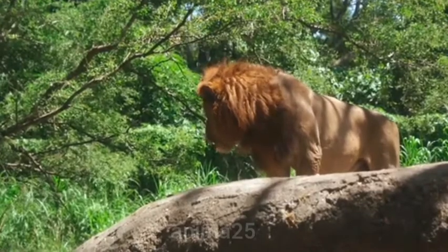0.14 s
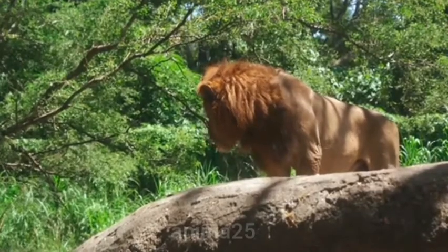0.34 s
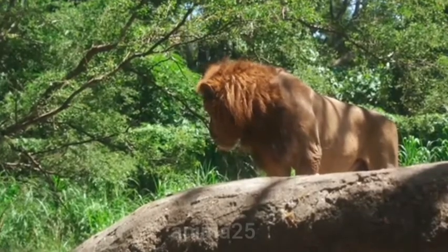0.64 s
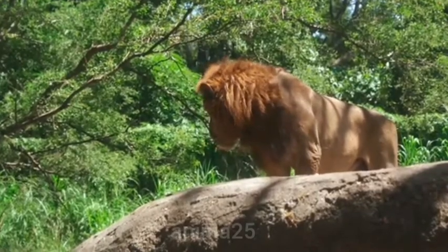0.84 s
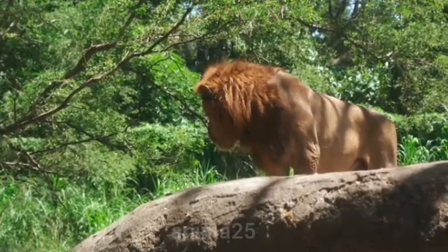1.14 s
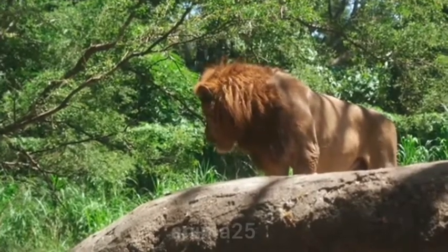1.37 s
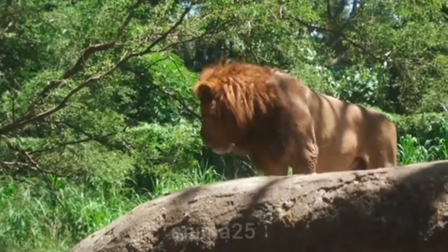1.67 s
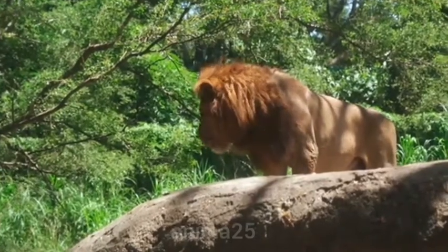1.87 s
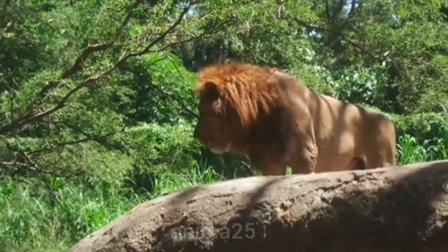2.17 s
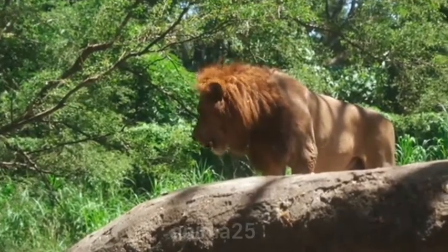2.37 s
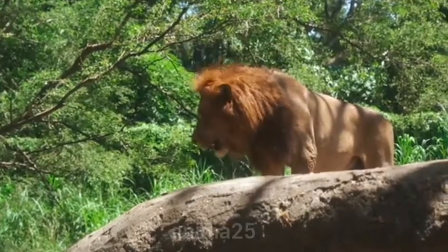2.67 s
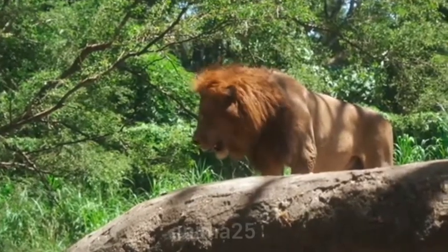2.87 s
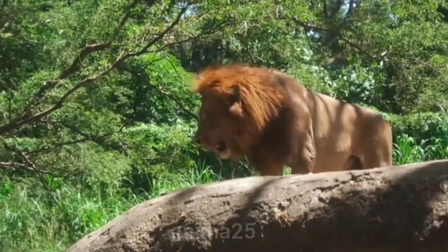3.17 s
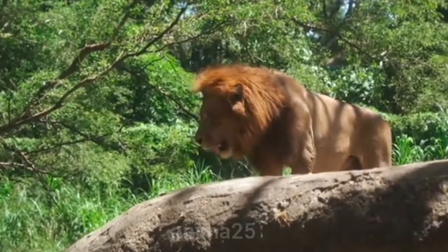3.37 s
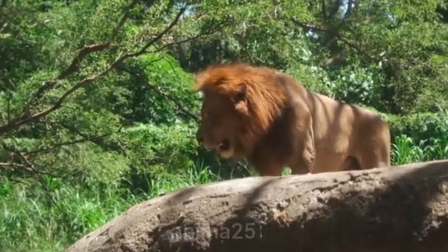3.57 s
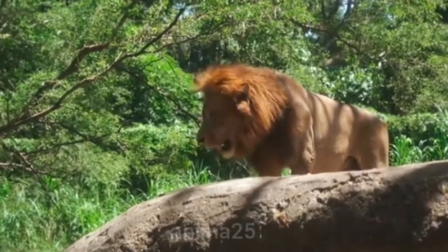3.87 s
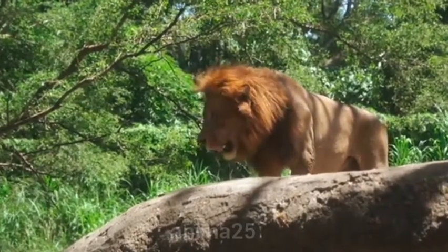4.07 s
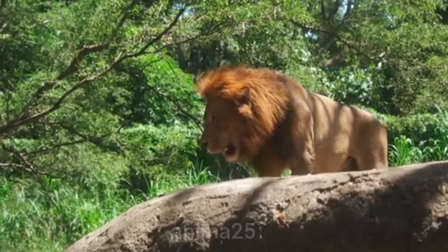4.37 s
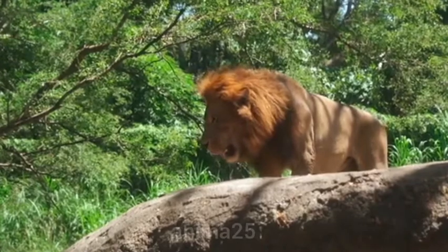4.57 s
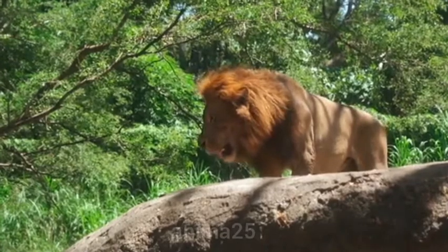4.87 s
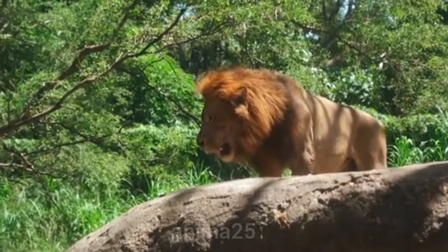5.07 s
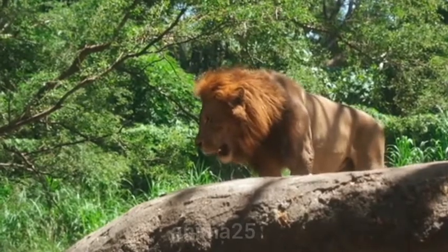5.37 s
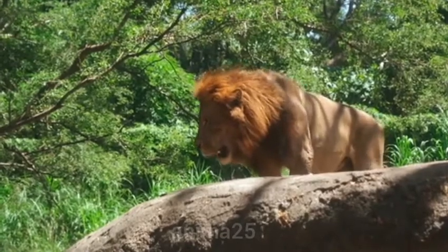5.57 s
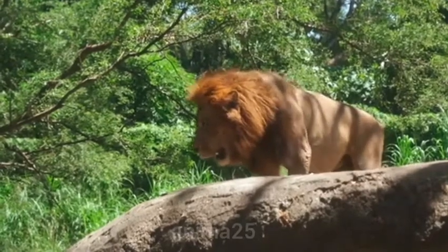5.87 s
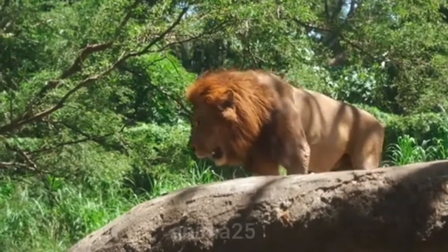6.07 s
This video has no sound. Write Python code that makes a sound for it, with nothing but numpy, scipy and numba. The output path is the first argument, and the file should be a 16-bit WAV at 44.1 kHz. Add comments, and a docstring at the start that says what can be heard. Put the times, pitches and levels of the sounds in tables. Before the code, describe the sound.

Five chesty lion grunts, roughly one per second, follow the harsh tail of a roar, over outdoor rush, low gusts and faint distant whistles.

```python
"""A male lion ends a roar and follows it with five deep grunts, about one a second, in a leafy outdoor enclosure.
Each grunt opens with a rasp, swells into a chesty tone and closes with a rasp: folds drive throat and mouth
resonances. Rock walls throw the voice back as smeared echoes, built by convolution.
Gusts of low noise buffet the microphone, and a thin far whistle, an airy gliding tone, wavers over a steady
outdoor rush of shaped noise."""
import sys
import numpy as np
from scipy import signal
from scipy.fft import rfft, irfft
from scipy.io import wavfile
from scipy.ndimage import uniform_filter1d
from numba import njit

SR = 44100
rng = np.random.default_rng(int(sys.argv[2]) if len(sys.argv) > 2 else 0)


def transcribe(u):
    """Save the signal u as a 16-bit wav file named by the first command-line argument.

    u: samples, shape (n,) or (channels, n), limited to [-1, 1]; the rate is SR.
    q: integer samples, one column per channel.
    """
    v = np.clip(np.atleast_2d(u).T, -1, 1)
    q = np.round(v * 32767).astype(np.int16)
    wavfile.write(sys.argv[1], SR, q)


N = 274302
TIME = np.arange(N) / SR

SHIMMER_DB = 2.2   # unsteadiness of the tones
PUFF_DEPTH = .85   # how deeply the turbulence swells and sinks in each cycle

# The five grunts, timed from the closing rasp; levels are before the trims in lion():
# closing_s, run_up_s (opening rasp before closing), lead_s (fullest tone before closing), swell_s, fade_s,
# pitch_hz, moan_db, chest_db, closing_moan_db, opening_rasp_db, closing_rasp_db, closing_length_s,
# opening_hiss_db, hiss_delay_s, closing_hiss_db, jaw (0-1), lift_db (upper resonances), tuning (throat ratio)
GRUNTS = [(1.263, 0.15, 0.046, 0.022, 0.017, 169.1, -36, -11, -21, -29.5, -26.5, 0.033, -44, 0.067, -39.5, 0.74, 2, 1.02),
          (2.295, 0.13, .039, 0.016, 0.022, 164.9, -34.5, -12, -26, -27.5, -29.5, 0.017, -42, 0.06, -42, 0.8, 0.5, 1.03),
          (3.352, 0.12, .043, .019, .011, 161.5, -36, -12, -22, -27, -28, 0.026, -41, .05, -43.5, 0.64, 1.5, 1.01),
          (4.402, .1, .033, .02, .013, 160.8, -28, -13.5, -20.5, -27, -31.5, 0.012, -42, .0033, -45.5, 0.94, 8.5, .995),
          (5.498, 0.089, 0.037, 0.017, .025, 154.2, -28, -17.5, -26, -27.5, -28, 0.017, -41.5, .003, -44, 0.67, 2, 0.99)]


def lion(clearing_db=16, jitter=.075, flutter_db=5.0, doubling=0.21, chest_db=-2.0, overtones_db=-25,
         between_db=-11, pulsing=0.2, rasp_db=-2.6, hiss_db=-2.0, tone_hiss_db=-33):
    """Heavy folds flap loosely at both ends of a grunt and lock into a clear tone in its middle."""
    pitch, tone = chest_tone()
    _, _, roar_rasp, roar_hiss, _ = roar()
    rasp = roar_rasp + rasp_pushes()
    hiss = np.hypot(roar_hiss + hiss_pushes(), from_db(tone_hiss_db) * tone)
    # the more the tone outweighs the rasp, the cleaner the voice
    rough = np.clip(.78 - 20 * np.log10(tone / rasp) / clearing_db, .33, .72)

    # the pitch wanders as the folds slacken
    cycles = 1 / 4 + np.cumsum(pitch * (1 + jitter * rough * drift(70))) / SR
    phase = 2 * np.pi * cycles
    chest = np.sqrt(2) * np.cos(phase) * from_db(SHIMMER_DB * rough * drift(52))

    # each cycle gives a pulse, with a puff of turbulence swelling around it
    pulses = rms_one(np.diff(np.floor(cycles), prepend=0) - pitch / SR)
    puffs = rms_one(rng.standard_normal(N) * (1 + PUFF_DEPTH * np.cos(phase)))
    # slack folds beat strong-weak
    strong_weak = 1 + doubling * rough * np.cos(phase / 2)
    flutter = from_db(flutter_db * rough * drift(84)) * strong_weak
    source = (np.sqrt(1 - rough) * pulses + rough * puffs) * flutter
    # that beat adds an unsteady partial between the first two
    between = from_db(between_db) * np.sqrt(2) * drift(21) * np.sin(phase * 3 / 2)

    # the throat rings with the rasp and, far more softly, with the chest tone
    drive = np.hypot(from_db(rasp_db) * rasp, from_db(overtones_db) * tone)
    breath = from_db(hiss_db) * hiss * mouth((puffs + pulsing * pulses) * flutter)
    growl = drive * throat(source) + rasp * between + breath
    clean = np.sqrt(tone * rasp) * overtones(phase, pitch)
    return from_db(chest_db) * tone * chest + clean + growl


# The harsh end of the last full roar; levels are before the trims in lion():
# time_s, pitch_hz, chest_db, rasp_db, hiss_db, jaw (0-1)
ROAR = [(0.0, 198.2, -11, -15.5, -33, 0.08), (0.051, 207.4, -29.5, -27, -40.5, 0.98),
        (0.079, 204.2, -19, -26, -32, 0.75), (0.109, 170.8, -24, -27.5, -42, 0.45),
        (0.143, 164.1, -22.5, -24, -39.5, 0.6), (0.183, 177.9, -36, -40, -44, 0)]
ROAR_FADE_S = .025


def roar():
    """Pitch, then strength of tone, rasp and hiss, then jaw opening of the roar as it dies away."""
    pitch, *levels, jaw = in_time(ROAR)
    fade = held(0, ROAR[-1][0], ROAR_FADE_S, ROAR_FADE_S)
    return pitch, *(from_db(levels) * fade), jaw * fade


MOAN_LEAD_S, MOAN_S, MOAN_RATIO = .03, .018, 1.13   # a soft, higher moan just before the opening rasp
PITCH_SAG, PITCH_ARCH_S = .105, .062   # the pitch drops by this share on both sides of the fullest tone
CREST_S = .04   # rounding of the chest tone's top
STOP_LAG_S, STOP_S = .02, .016   # the folds stop soon after the closing rasp begins
CLOSING_LAG_S, CLOSING_MOAN_S, CLOSING_RATIO = .014, .018, 1.07   # the last push jerks the pitch up again


def chest_tone():
    """Pitch and strength of the folds: a brief moan, a swell whose pitch arches with effort, a moan to close."""
    pitch, strength, *_ = roar()
    weighted = pitch * strength
    for closing, run_up, lead, swell_s, fade_s, hz, moan_db, tone_db, last_db, *_ in GRUNTS:
        age = TIME - (closing - lead)
        from_crest = np.hypot(age, CREST_S) - CREST_S
        swell = from_db(tone_db) * np.exp(-from_crest / np.where(age < 0, swell_s, fade_s))
        swell = swell * held(0, closing + STOP_LAG_S, STOP_S, STOP_S)
        moan = from_db(moan_db) * np.exp(-((TIME - (closing - run_up - MOAN_LEAD_S)) / MOAN_S) ** 2)
        last = from_db(last_db) * np.exp(-((TIME - closing - CLOSING_LAG_S) / CLOSING_MOAN_S) ** 2)
        sag = PITCH_SAG * (1 - np.exp(-(age / PITCH_ARCH_S) ** 2))
        strength = strength + swell + moan + last
        weighted = weighted + hz * (swell * (1 - sag) + moan * MOAN_RATIO + last * CLOSING_RATIO)
    # where sounds overlap, the stronger one sets the pitch
    return weighted / strength, strength


def rasp_pushes(attack_s=.01, slow_share=.3, release_s=0.019, snap_s=0.0057, closing_release_s=0.046,
                sag_db_per_s=45):
    """Air rasps in the throat: a long push to the fullest tone, sudden in the last grunts, and a closing one."""
    level = 0
    for closing, run_up, lead, _, _, _, _, _, _, open_db, close_db, length, _, delay, *_ in GRUNTS:
        opening = closing - run_up
        sag_db = sag_db_per_s * np.clip(TIME - opening, 0, run_up)
        rise_s = attack_s + slow_share * abs(delay)
        first_push = from_db(open_db - sag_db) * held(opening, closing - lead, rise_s, release_s)
        closing_push = from_db(close_db) * held(closing, closing + length, snap_s, closing_release_s)
        level = level + first_push + closing_push
    return level


def hiss_pushes(attack_s=0.0048, slow_share=0.89, release_s=0.035, sag_db_per_s=60, snap_s=0.0021,
                closing_lag_s=0.016, closing_hold_s=.023, closing_release_s=0.04):
    """The mouth hisses with the same two pushes; the later the first comes, the slower it builds."""
    level = 0
    for closing, run_up, lead, *_, open_db, delay, close_db, _, _, _ in GRUNTS:
        first, second = closing - run_up + delay, closing + closing_lag_s
        sag_db = sag_db_per_s * np.clip(TIME - first, 0, run_up)
        rise_s = attack_s + slow_share * abs(delay)
        first_push = from_db(open_db - sag_db) * held(first, closing - lead, rise_s, release_s)
        closing_push = from_db(close_db) * held(second, second + closing_hold_s, snap_s, closing_release_s)
        level = level + first_push + closing_push
    return level


# Low throat resonances: rest_hz, by_jaw_hz (added by a wide jaw), by_effort_hz (added at the fullest tone),
# by_roar_hz (added in the roar), width_hz, level_db (relative)
THROAT = [(410, 79.5, -24.5, -14, 60, 5), (540, 77.5, 1.5, -26.5, 47, -15.5), (809, -15, -12, 58, 56, -7.5),
          (1115, -9, 98, -27, 39, 1), (1270, 118, 59, -16, 174, -11.5), (1617, 8, 7.5, -43, 56, -8.5),
          (2127, -180, -5.5, -7, 140, -20)]
ROAR_LIFT_DB = -1.5   # the roar starts with its upper resonances held down
EFFORT_HALF_S = 0.047   # how long the throat is tensed around the fullest tone


def throat(source, low_hz=220, top_hz=2100, wobble=0.018):
    """The long throat's resonances bend with the jaw and the effort, and wobble with the soft tissue."""
    jaw = jaw_opening()
    roaring = held(0, ROAR[-1][0], ROAR_FADE_S, ROAR_FADE_S)
    effort = sum(np.exp(-((TIME - closing + lead) / EFFORT_HALF_S) ** 2) for closing, _, lead, *_ in GRUNTS)
    roar_shape = [(0, ROAR_LIFT_DB, 1), (ROAR[-1][0], 0, 1)]
    grunt_shape = [(closing, lift_db, ratio) for closing, *_, lift_db, ratio in GRUNTS]
    lift, tuning = in_time(roar_shape + grunt_shape)
    stretch = tuning * (1 + wobble * drift(12))
    rings = 0
    for k, (rest, by_jaw, by_effort, by_roar, width, db) in enumerate(THROAT):
        centre = (rest + by_jaw * jaw + by_effort * effort + by_roar * roaring) * stretch
        gain = from_db(db + lift * (k > 0))
        # neighbours alternate in sign
        rings = rings + (-1) ** k * gain * resonate(source, centre, float(width))
    return even(cut(cut(rings, low_hz, "high"), top_hz, "low", order=4), size=700)


# High mouth resonances: centre_hz, width_hz, level_db (relative)
MOUTH = [(1974, 260, -0.5), (2410, 400, 1), (2702, 150, 4), (3036, 310, -1), (3313, 205, 0.5),
         (3695, 120, -6.5), (4340, 150, -7), (5090, 240, -8.5), (5950, 170, -12.5), (6600, 350, -23.5),
         (7940, 230, -24), (9000, 830, -31), (11900, 8700, -40)]
# Tilt of the hiss's top resonances: time_s, treble_db
TREBLE_DB = [(0.1, 3), (1.2, -1.5), (2.25, 4), (3.3, 0), (4.35, -3.5), (5.45, -3)]


def mouth(turbulence, shift=0.042, treble_from_hz=6300):
    """Turbulence rings in steep mouth resonances that shift with the jaw; the treble differs by grunt."""
    out = 0
    stretch = 1 + shift * (jaw_opening() - .5)
    treble_db, = in_time(TREBLE_DB)
    for hz, width, db in MOUTH:
        # two passes steepen the skirts
        once = resonate(turbulence, hz * stretch, float(width))
        twice = resonate(once, hz * stretch, float(width))
        out = out + from_db(db + treble_db * (hz > treble_from_hz)) * twice
    return even(out)


JAW_LAG_S, JAW_HALF_S = 0.0022, 0.044   # the jaw is widest just after the closing rasp begins


def jaw_opening():
    """The jaw closes after the roar, then drops and closes once a grunt."""
    drops = sum(wide * np.exp(-((TIME - closing - JAW_LAG_S) / JAW_HALF_S) ** 2)
                for closing, *_, wide, _, _ in GRUNTS)
    return roar()[-1] + drops


# Clean overtones of the chest tone: pitch_hz, level_db (relative)
OVERTONES = [(330, -16), (490, -18), (650, -29), (810, -24), (980, -29), (1170, -15), (1330, -30),
             (1620, -28), (2000, -37)]
OVERTONE_LIFT_SHARE = 0.24   # share of a grunt's lift that its upper overtones get
OVERTONE_FLICKER_DB, OVERTONE_FLICKER_HZ = 3.5, 20


def overtones(phase, pitch, count=11):
    """Locked folds close sharply once a cycle: harmonics bend with the pitch, each flickering by itself."""
    lift, = in_time([(closing, lift_db) for closing, *_, lift_db, _ in GRUNTS])
    out = 0
    for k in range(2, count):
        flicker_db = OVERTONE_FLICKER_DB * drift(OVERTONE_FLICKER_HZ)
        db = at_hz(OVERTONES, k * pitch) + OVERTONE_LIFT_SHARE * lift * (k > 3) + flicker_db
        out = out + np.sqrt(2) * from_db(db) * np.cos(k * phase)
    return out


# The lowest throat resonance locks on and sings: start_s, end_s, first_hz, last_hz, level_db (before trim)
BELLOWS = [(0.0, 0.029, 397, 460.3, -22.5), (.078, 0.101, 531.4, 503.9, -27),
           (0.132, .155, 414.7, 402.8, -27), (1.092, 1.144, 428.6, 454.3, -28),
           (1.257, 1.318, 522, 476, -25.5), (2.172, 2.188, 422.9, 412, -25),
           (2.325, 2.349, 465, 457.9, -33), (3.229, 3.255, 437, 405, -30.5),
           (3.35, 3.37, 536.1, 500, -29.5), (4.305, 4.342, 432, 417.2, -30.5),
           (4.403, 4.418, 543, 511.6, -31), (5.411, 5.444, 400, 456.3, -29),
           (5.493, 5.528, 492.1, 415.5, -27)]
BELLOW_EDGE_S, BELLOW_WAVER = .007, .04   # fade at both ends; pitch waver as a share


def bellows(level_db=-3.5):
    """At the height of a push the throat's lowest resonance rings as a nearly pure, gliding note."""
    level, weighted = 0, 0
    for start, end, first_hz, last_hz, db in BELLOWS:
        gain = from_db(db + level_db) * held(start, end, BELLOW_EDGE_S, BELLOW_EDGE_S)
        level = level + gain
        weighted = weighted + gain * np.interp(TIME, [start, end], [first_hz, last_hz])
    pitch = weighted / level * (1 + BELLOW_WAVER * drift(90))
    phase = 2 * np.pi * np.cumsum(pitch) / SR
    return level * np.sqrt(2) * np.sin(phase) * from_db(SHIMMER_DB * drift(69))


# The folds catch and slap: time_s, level_db (before trim)
CATCHES = [(0.066, -23), (0.128, -25.5), (1.259, -24.5), (1.284, -27.5), (2.18, -29), (2.292, -17.5),
           (4.278, -26.5), (4.311, -23), (4.402, -25), (5.409, -24), (5.417, -28)]
CATCH_RISE_S, CATCH_DECAY_S = .0005, .009


def catches(level_db=-3.5, low_hz=700, top_hz=1300, edge_hz=1900):
    """A catch is a quick broad bark: a burst of band-limited noise that dies within hundredths of a second."""
    force = sum(from_db(db + level_db) * held(s + CATCH_RISE_S, s + CATCH_RISE_S, CATCH_RISE_S, CATCH_DECAY_S)
                for s, db in CATCHES)
    bark = even(cut(cut(rng.standard_normal(N), low_hz, "high"), top_hz, "low", order=4), size=200)
    return cut(force * bark, edge_hz, "low", order=4)


# Soft gasps between and after the grunts: time_s, half_s (half duration), level_db
GASPS = [(3.553, 0.073, -59.5), (4.557, 0.076, -58), (5.654, 0.03, -54.5), (5.75, 0.04, -54.5)]


def gasps(top_hz=3800):
    """The lion hauls air back through its open mouth: soft swells of mouth-shaped noise."""
    flow = sum(from_db(db) * np.exp(-((TIME - s) / half) ** 2) for s, half, db in GASPS)
    return flow * rms_one(cut(mouth(rng.standard_normal(N)), top_hz, "low"))


# Echoes off rock walls: delay_s, level_db (before filtering)
ECHOES = [(0.044, -35.5), (0.107, -30.5), (.152, -22.5), (0.225, -17.5), (0.334, -28)]


def enclosure(x, wall_hz=5000, smear_s=0.0091, smear_db=-3, tail_db=-18, tail_t60=1.0, tail_hz=4200, side_db=-3):
    """Rough rock gives a few smeared echoes; foliage scatters a fading tail."""
    t = TIME[:SR]
    echoes, smear = np.zeros(SR), np.zeros(SR)
    for delay, db in ECHOES:
        echoes[round(delay * SR)] = from_db(db)
        fading = (t > delay) * np.exp(-np.abs(t - delay) / smear_s) * np.sqrt(2 / smear_s / SR)
        smear += from_db(db + smear_db) * fading
    tail = from_db(tail_db) * rms_one(np.exp(-np.log(1000) * t / tail_t60)) / np.sqrt(SR)
    mid, side = rng.standard_normal((2, SR))
    # long waves reach both ears alike
    grain = mid + from_db(side_db) * cut(side, 450, "high") * [[1], [-1]]
    # reversing the grain gives the tail its own noise; leaves scatter the long waves least
    scatter = cut(cut(smear * grain + tail * grain[:, ::-1], tail_hz, "low"), 180, "high", order=1)
    # the mirrored opening stands in for the roar's earlier swell, so its echoes are already on their way
    swelled = np.concatenate([x[SR // 4:0:-1], x])
    response = cut(echoes, wall_hz, "low") + scatter
    return signal.fftconvolve(swelled[None], response, axes=1)[:, SR // 4:SR // 4 + N]


# Gusts at the microphone: start_s, end_s, level_db (before trim)
GUSTS = [(0.083, 0.16, -27), (0.366, 0.691, -29.5), (1.441, 1.542, -28.5), (2.074, 2.167, -27.5),
         (2.357, 2.964, -31), (3.08, 3.151, -31.5), (3.381, 3.424, -31), (3.755, 3.816, -35.5)]
# Spectrum of the gusts: centre_hz, level_db (per Hz, relative)
GUST_COLOUR = [(15, -51.5), (25, -30.5), (101, 1.5), (123, -5), (224, -3), (253, -9.5), (454, -23),
               (600, -19.5), (780, -69), (1320, -120)]
# Difference between the ears against their sum: centre_hz, side_db
GUST_WIDTH = [(60, -9), (92, -16.5), (140, -7.5), (210, -6.5), (330, -2.5)]
GUST_RISE_S, GUST_FALL_S = 0.082, 0.052
BREEZE_END_S, BREEZE_DB = 3.8, -43   # light air between the gusts, until the wind drops; level before trim


def wind(level_db=-0.5, lumps_db=4, top_hz=450, low_hz=72):
    """Lumpy low turbulence at the microphone ports: gusts over a breeze, then the wind drops."""
    gusts = [from_db(db) * held(start, end, GUST_RISE_S, GUST_FALL_S)
             for start, end, db in GUSTS + [(0, BREEZE_END_S, BREEZE_DB)]]
    eddies = cut(cut(coloured(GUST_COLOUR, GUST_WIDTH), top_hz, "low", order=3), low_hz, "high")
    lumpy = rms_one(eddies * from_db(lumps_db * np.tanh(drift(38))))
    return np.max(gusts, axis=0) * from_db(level_db) * lumpy


# The strongest buffets: time_s, level_db (before trim), ring_hz
BUFFETS = [(0.089, -10, 163), (0.126, -28, 151), (0.332, -7.5, 127), (0.435, -10.5, 159),
           (0.465, -13.5, 171), (0.521, -13.5, 121), (0.534, -7, 142), (0.607, -9.5, 127),
           (0.659, -14.5, 200), (0.695, -14, 165), (0.743, -16.5, 152), (1.453, -22, 149),
           (1.495, -11.5, 138), (1.513, -13.5, 138), (1.545, -13, 150), (1.646, -18, 140),
           (1.657, -18.5, 130), (2.111, -8, 207), (2.406, -15, 170), (2.548, -18.5, 153), (2.64, -17, 118),
           (2.666, -21, 128.7), (2.712, -13.5, 167), (2.758, -12, 148), (2.783, -16, 139),
           (2.873, -18, 130), (2.923, -16, 124), (2.956, -15, 100), (3.087, -17, 135), (3.138, -20.5, 110),
           (3.766, -19.5, 170), (3.818, -20, 136)]


def buffets(level_db=-5.0, length_cycles=0.51, side_db=-3, side_ratio=1.71, flick_db=-8, flick_ratio=2.42):
    """A strong eddy shoves both diaphragms, which swing back in a cycle or two; finer swirls differ by side."""
    out, t = np.zeros((2, N)), TIME[:SR // 10]
    ways = rng.choice([-1, 1], len(BUFFETS))   # which side each swirl favours
    for (s, db, hz), way in zip(BUFFETS, ways):
        turns = np.outer([hz, hz * side_ratio, hz * flick_ratio], t)
        at = round(s * SR)
        age = turns / length_cycles
        shove, swirl, flick = age * np.exp(1 - age) * np.sin(2 * np.pi * turns)
        common = shove + from_db(flick_db) * flick
        sides = way * from_db(side_db) * swirl * [[1], [-1]]
        out[:, at:at + len(t)] -= from_db(db + level_db) * (common + sides)
    return cut(cut(out, 476, "low", order=4), 79, "high")


# Far whistles, each an arch; level is before trim:
# start_s, top_s, end_s, top_hz, scoop_hz (opening rise), fall_hz (final drop), level_db
WHISTLES = [(.35, .39, .5, 2030, 60, 170, -56), (.595, .67, .86, 2130, 220, 140, -54),
            (.89, .93, 1.05, 2040, 60, 260, -55), (1.375, 1.385, 1.52, 1970, 10, 270, -47),
            (1.535, 1.552, 1.59, 1970, 190, 240, -52), (1.7, 1.86, 1.99, 2150, 130, 200, -51.5),
            (2.02, 2.07, 2.13, 2090, 240, 100, -53.5), (2.35, 2.38, 2.43, 1820, 30, 90, -56),
            (2.46, 2.49, 2.59, 2000, 100, 160, -59), (2.67, 2.71, 2.77, 2050, 90, 90, -59),
            (2.94, 3.02, 3.12, 2060, 280, 130, -59), (3.6, 3.67, 3.77, 2240, 80, 110, -60),
            (5.265, 5.32, 5.405, 1870, 110, 120, -56), (5.92, 5.99, 6.12, 1920, 200, 170, -57.5)]
WHISTLE_BLUR_HZ, WHISTLE_STEADY = 40, .7   # rate of the blur; steady share of the tone
WHISTLE_AIR, WHISTLE_AIR_HZ = .8, 190.   # amount and bandwidth of the breathy noise


def whistle(level_db=-0.5, overtone_db=-15, flicker_db=0.5, late_s=0.051, late_db=-8, fade_s=0.018):
    """Far airy whistles scoop up and fall, with a weak upper partial; the trees blur and double them."""
    level, weighted = 0, 0
    for start, top, end, top_hz, scoop_hz, fall_hz, db in WHISTLES:
        before = np.interp(TIME, [start, top], [1, 0])
        after = np.interp(TIME, [top, end], [0, 1])
        gain = from_db(db) * held(start, end, fade_s, fade_s)
        level = level + gain
        weighted = weighted + gain * (top_hz - scoop_hz * before ** 2 - fall_hz * after ** 1.3)
    pitch = weighted / level
    phase = 2 * np.pi * np.cumsum(pitch) / SR
    tone = (WHISTLE_STEADY + drift(WHISTLE_BLUR_HZ)) * np.sin(phase) + drift(WHISTLE_BLUR_HZ) * np.cos(phase)
    tone = tone + from_db(overtone_db) * drift(WHISTLE_BLUR_HZ) * np.sin(phase * 6 / 5)
    tone = tone + WHISTLE_AIR * rms_one(resonate(rng.standard_normal(N), pitch, WHISTLE_AIR_HZ))
    direct = level * from_db(level_db + flicker_db * drift(4.7)) * rms_one(tone)
    return direct + from_db(late_db) * np.interp(TIME - late_s, TIME, direct)


# Spectrum of the outdoor rush: centre_hz, level_db (per Hz, relative)
AIR = [(25, -31), (50, -13), (100, 2), (170, 3.5), (300, -2.5), (500, -2), (850, 0), (1200, -6),
       (1900, -17), (2600, -27), (4200, -36), (6300, -41.5), (8800, -44), (14000, -53.5)]
# Difference between the ears against their sum: centre_hz, side_db
AIR_WIDTH = [(90, -47), (210, -40.5), (330, -15.5), (1170, -13.5), (2700, -1.5), (5500, 2.5), (8000, -5.5)]
# Level of the rush, around which it sways: time_s, level_db
AIR_DB = [(0, -41.5), (1.8, -40.5), (2.9, -41), (3.9, -39.5), (5.1, -41), (6.22, -41.5)]


def air(sway_db=1.36):
    """The steady rush of the surroundings: wide shaped noise that sways a little in level."""
    level, = in_time(AIR_DB)
    return from_db(level + sway_db * drift(11.2)) * coloured(AIR, AIR_WIDTH)


def from_db(db):
    """Decibels to gain."""
    return 10 ** (np.asarray(db) / 20)


def rms_one(x):
    """Scale to unit power."""
    return x / np.sqrt(np.mean(x ** 2) + 1e-20)


def in_time(rows):
    """Each column of a curve, at every sample."""
    s, *columns = np.transpose(rows)
    return [np.interp(TIME, s, c) for c in columns]


def at_hz(points, hz):
    """Read a spectrum on a log-frequency axis."""
    known, db = np.transpose(points)
    return np.interp(np.log(hz), np.log(known), db)


def held(start, end, attack_s, release_s):
    """An envelope that rises to 1 at the start, holds to the end and dies away."""
    rise = np.maximum(start - TIME, 0) / attack_s
    fall = np.maximum(TIME - end, 0) / release_s
    return np.exp(-np.minimum(rise + fall, 30))


def cut(x, hz, kind, order=2):
    """Butterworth filter."""
    return signal.sosfilt(signal.butter(order, np.minimum(hz, SR / 2 - 1), kind, fs=SR, output="sos"), x)


def drift(rate_hz):
    """Random wander, low-passed at the rate, with spread 1."""
    return rms_one(cut(rng.standard_normal(N + SR), rate_hz, "low")[SR:])


def even(x, size=1103):
    """Hold the short-time level at 1."""
    return x / np.sqrt(uniform_filter1d(x ** 2, size) + 1e-12)


def coloured(spectrum, width):
    """Stereo noise of a given spectrum and width."""
    hz = np.arange(N // 2 + 1) * SR / N + 1
    mid, side = rfft(rng.standard_normal((2, N))) * from_db(at_hz(spectrum, hz))
    return rms_one(irfft(mid + from_db(at_hz(width, hz)) * side * [[1], [-1]], N))


@njit
def resonate(x, hz, width):
    """A two-pole resonance whose centre moves; gain about 1 on top."""
    y, r = np.zeros(len(x)), np.exp(-np.pi * width / SR)
    for i in range(2, len(x)):
        push = (1 - r * r) / 2 * (x[i] - x[i - 2])
        y[i] = push + 2 * r * np.cos(2 * np.pi * hz[i] / SR) * y[i - 1] - r * r * y[i - 2]
    return y


def scene():
    """The lion straight ahead, its echoes and the weather around."""
    voice = lion() + bellows() + catches() + gasps()
    return voice + enclosure(voice) + wind() + buffets() + whistle() + air()


CUTOFF_HZ = 16500


def record(dry):
    """The microphone sheds the deepest rumble; the top is cut."""
    thinned = cut(dry, 28, "high")
    return signal.sosfilt(signal.cheby2(12, 70, CUTOFF_HZ, fs=SR, output="sos"), thinned)


dry = scene()
out = record(dry)
transcribe(out)
```